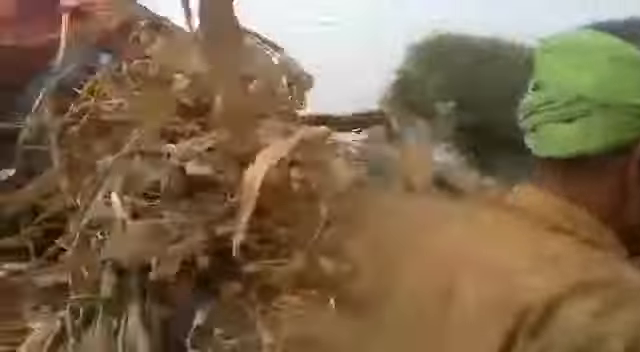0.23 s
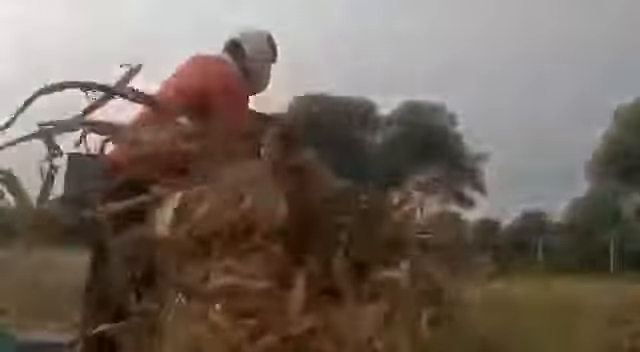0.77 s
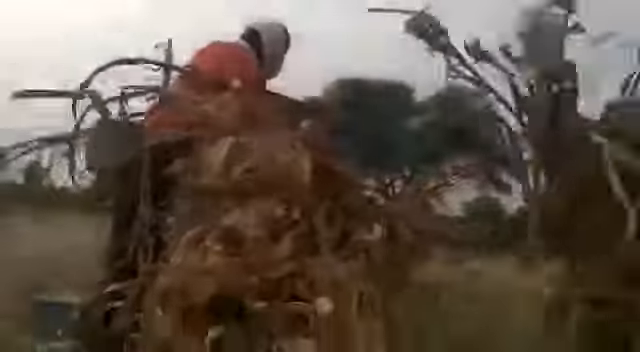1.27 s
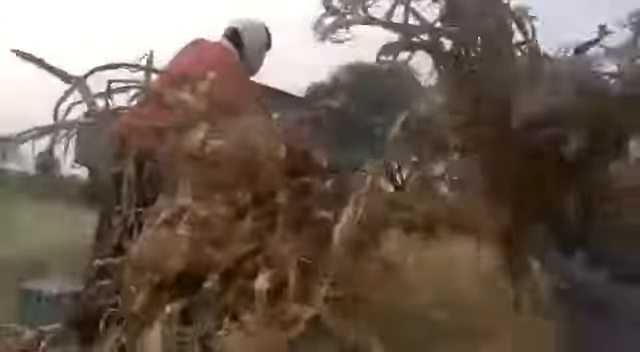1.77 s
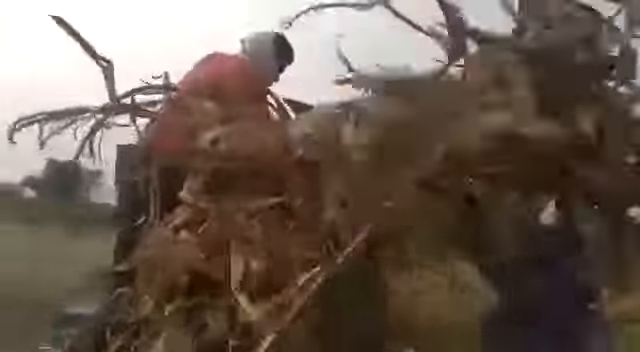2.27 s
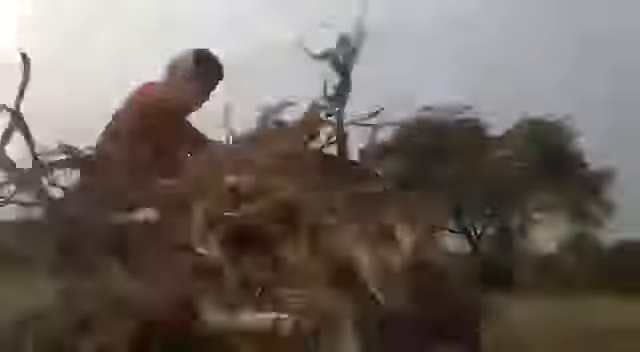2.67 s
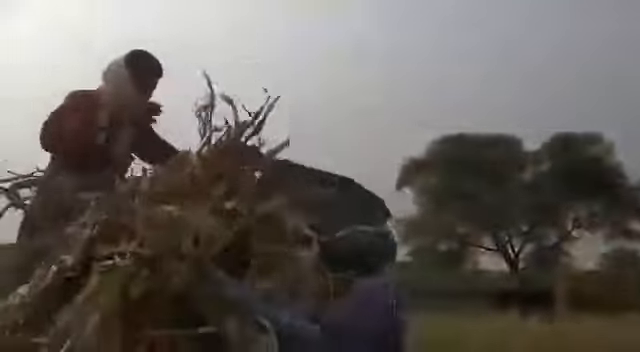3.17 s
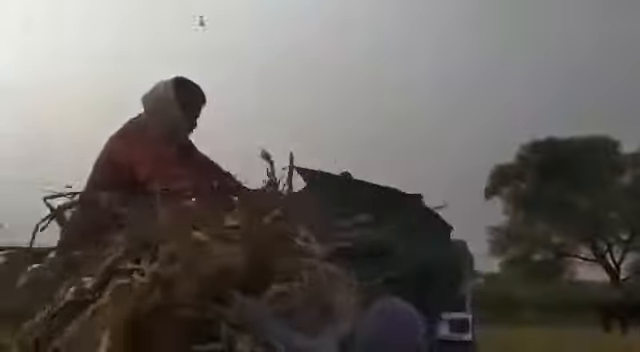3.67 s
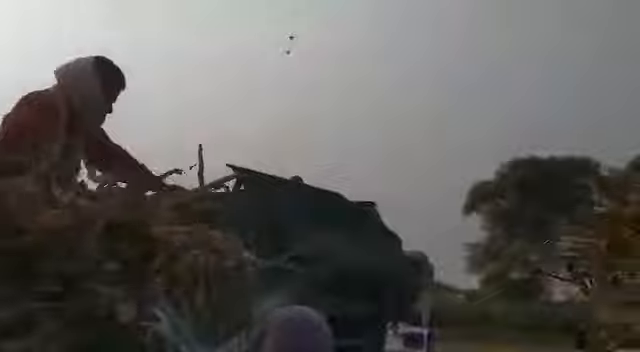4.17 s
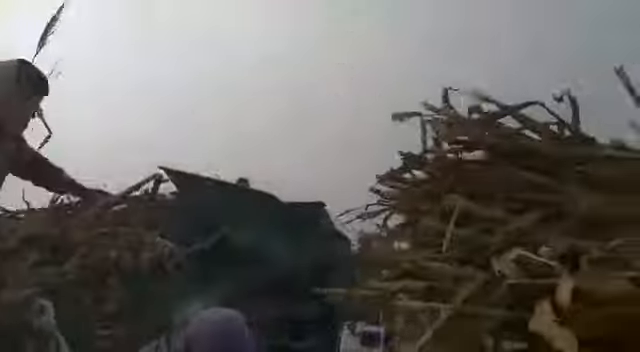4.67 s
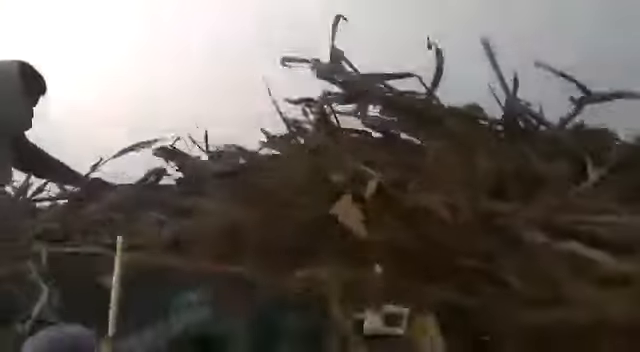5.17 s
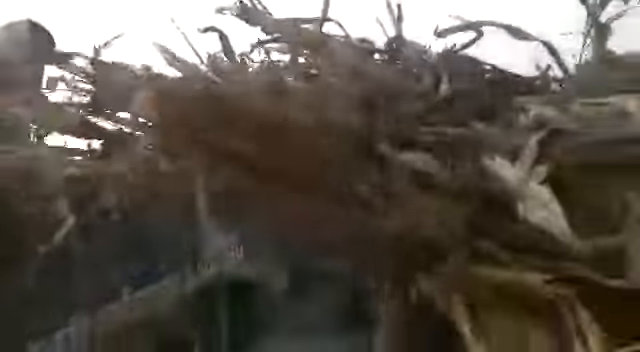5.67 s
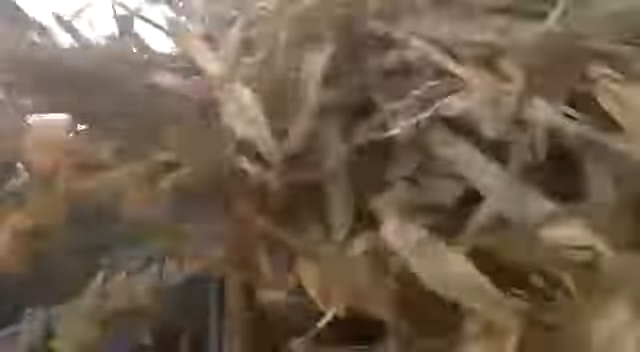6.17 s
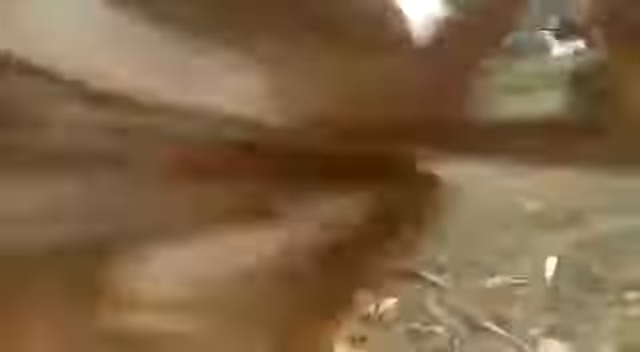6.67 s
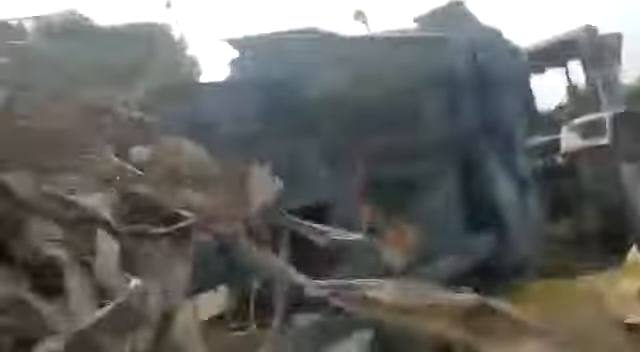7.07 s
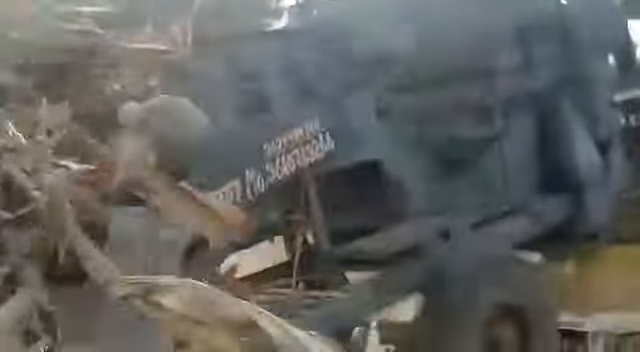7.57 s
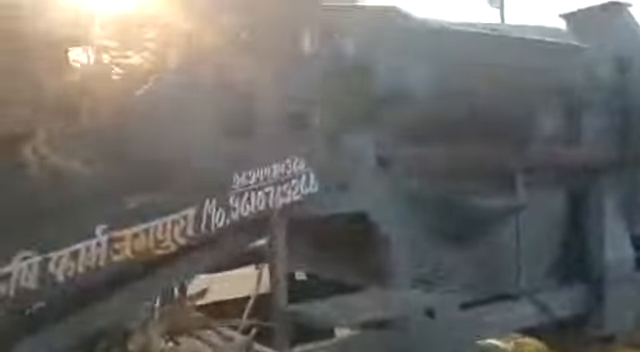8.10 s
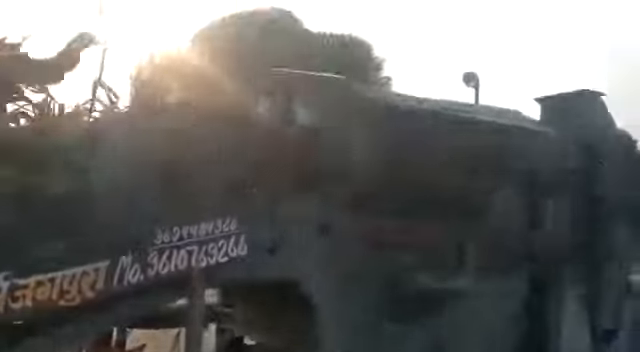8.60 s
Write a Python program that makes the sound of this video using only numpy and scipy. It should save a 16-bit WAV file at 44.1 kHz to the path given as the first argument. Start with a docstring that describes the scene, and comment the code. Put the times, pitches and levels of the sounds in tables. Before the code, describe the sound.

Rapid hollow metal knocking rides on a steady engine drone and rushing fan air, as dry straw crackles nearby and one stalk snaps sharply.

```python
"""An open field: a tractor's diesel drives a thresher, heard by someone walking round the feed chute.
The exhaust drones as a stack of sines locked to the engine's firings.
The drum, geared to the engine, chops into dry stalks once a turn: steel rings clack and boom, tiny clicks crunch.
The blower is shaped noise that rushes and howls in its casing; the side sheet and rotating parts hum.
Showers of tiny clicks make chaff hiss and close stalks rustle; short bright rings are stalks that snap."""
import sys
import numpy as np
from scipy import signal
from scipy.fft import rfft, irfft, next_fast_len
from scipy.io import wavfile
from scipy.ndimage import uniform_filter1d, minimum_filter1d

SR = 44100
rng = np.random.default_rng(int(sys.argv[2]) if len(sys.argv) > 2 else 0)


def generate_wav(sig):
    """Save sig (samples, or channels by samples) to the path in sys.argv[1] as 16-bit PCM at SR."""
    pcm = np.round(np.clip(np.atleast_2d(sig).T, -1, 1) * 32767).astype(np.int16)
    wavfile.write(sys.argv[1], SR, pcm)


N = 389844

# pitch of the housing panel that faces the listener: t/s, f/Hz
PANEL_PITCH = [(0, 378), (.6, 380), (1.3, 320), (2.2, 360), (4.2, 400), (6.1, 288), (6.75, 322), (7.2, 290),
               (8.84, 284)]
# single knocks of the drum, strong and faint, before the ports:
# t/s, boom peak/dB, boom f/Hz, clack peak/dB, clack f/Hz
DRUM_KNOCKS = [(0.0425, -10, 357, -27, 870), (0.1047, -11, 335, -14.5, 840), (0.1725, -9, 390, -21, 810),
               (0.2375, -20, 365, -20, 945), (0.3015, -17, 385, -20, 875), (0.3719, -16, 377, -27, 910),
               (0.428, -14, 368, -19, 880), (0.4962, -11.5, 354, -8, 850), (0.5622, -12.5, 340, -23, 845),
               (0.6262, -8, 342, -16, 930), (0.691, -15, 325, -14, 940), (0.7577, -11.5, 315, -13, 960),
               (0.8217, -8.5, 348, -16, 780), (0.8841, -15, 384, -22.5, 824), (0.951, -13.5, 366, -21, 980),
               (1.0118, -13, 353, -22, 870), (1.079, -9, 317, -15, 870), (1.1427, -8.5, 340, -13, 840),
               (1.209, -7, 318, -19, 800), (1.2755, -11.5, 325, -15, 880), (1.338, -8.5, 307, -11, 850),
               (1.402, -18, 330, -17, 850), (1.4694, -7.5, 318, -11, 746), (1.531, -11, 330, -11.5, 980),
               (1.5961, -10, 317, -15, 850), (1.66, -17, 355, -21, 850), (1.724, -15, 368, -14.5, 810),
               (1.7868, -17, 377, -14, 1010), (1.85, -16.5, 403, -15, 830), (1.9174, -24, 370, -16.5, 840),
               (2.046, -19, 333, -15, 805), (2.1744, -18, 365, -15, 760), (2.304, -17, 324, -16, 930),
               (2.3663, -19, 370, -17, 860), (2.4301, -19, 345, -18, 830), (2.496, -20, 374, -18, 990),
               (2.5595, -23, 360, -24, 950), (2.6233, -23, 357, -19, 900), (2.688, -29, 360, -18, 905),
               (2.8776, -15.5, 333, -19, 870), (5.4814, -28, 345, -14.5, 760), (5.6085, -18, 407, -17, 800),
               (5.672, -17, 310, -19, 760), (5.8643, -19, 326, -22, 736), (5.928, -16, 312, -20, 740),
               (5.992, -17, 315, -23, 736), (6.055, -16, 310, -21, 750), (6.1213, -15.5, 305, -20, 745),
               (6.1784, -15.5, 310, -14.5, 756), (6.2432, -15, 322, -16, 690), (6.3076, -14, 295, -20, 780),
               (6.3704, -8, 302, -14, 770), (6.434, -12, 350, -20, 726), (6.4991, -10, 305, -14, 770),
               (6.5611, -12.5, 324, -18, 830), (6.625, -8, 330, -29, 880), (6.6902, -5.5, 323, -20, 680),
               (6.7539, -9.5, 320, -30, 850), (6.8168, -11, 304, -27, 840), (6.881, -15, 356, -19, 890),
               (6.944, -18, 310, -22, 850), (7.008, -21, 302, -18, 830), (7.135, -22, 300, -17, 780),
               (7.3257, -23, 320, -14.5, 850), (7.3942, -17, 308, -15.5, 805), (7.454, -23, 355, -14, 880),
               (7.518, -27, 302, -17, 800), (7.5859, -22, 285, -13.5, 820), (7.7102, -27, 305, -16.5, 750),
               (7.8982, -35, 310, -20, 744), (7.963, -37, 370, -22, 710), (8.0281, -27, 398, -12.5, 684),
               (8.0908, -32, 377, -20, 700), (8.1546, -24, 345, -27, 715), (8.2211, -18, 328, -19, 670),
               (8.283, -22, 292, -18, 720), (8.3471, -12, 330, -16, 776), (8.4106, -13, 280, -18, 760),
               (8.476, -20, 285, -27, 760), (8.538, -16.5, 300, -19, 710), (8.603, -20, 285, -18, 720),
               (8.666, -24, 308, -18, 810), (8.7298, -24, 320, -14, 875)]


def from_db(db):
    """Turn decibels into a plain gain."""
    return 10 ** (np.asarray(db) / 20)


def rms_one(x):
    """Scale a sound to an average strength (rms) of 1."""
    return x / np.sqrt(np.mean(x ** 2) + 1e-20)


def in_time(rows):
    """Draw each column of a table as a curve, with a value at every sample."""
    s, *columns = np.transpose(rows)
    return [np.interp(np.arange(N) / SR, s, column) for column in columns]


def per_bin(points):
    """Read a table over log frequency at every bin of the spectrum."""
    hz, value = np.transpose(points)
    bin_hz = np.fft.rfftfreq(next_fast_len(N), 1 / SR)
    return np.interp(np.log(bin_hz + 1), np.log(hz), value)


def drift(rate):
    """Smooth chance wandering, with about `rate` turns a second and a spread of 1."""
    step = 40  # samples between the computed points
    r = np.exp(-2 * np.pi * rate * step / SR)
    noise = rng.standard_normal(N // step + 2002)
    slow = signal.lfilter([1], [1, -2 * r, r * r], noise)[2000:]  # skip the filter's start
    return np.interp(np.arange(N) / step, np.arange(len(slow)), rms_one(slow))


def ring(clicks, hz, t60):
    """Each unit click starts a sine of height 1 that dies by 60 dB in t60 seconds."""
    r = np.exp(-np.log(1000) / (t60 * SR))
    w = 2 * np.pi * hz / SR
    return signal.lfilter([0, np.sin(w)], [1, -2 * r * np.cos(w), r * r], clicks + 1e-18)


def panned(pan_db):
    """Left and right gains for a level difference (positive: left is louder)."""
    return from_db(pan_db * np.array([[.5], [-.5]]))


def ports(pair, spectrum=None):
    """Two microphone ports pick up a direct and a scattered signal, coloured by the spectrum if given."""
    # how alike the two ports hear: f/Hz, likeness [-1 to 1]
    likeness = [(100, 1), (400, 0.53), (750, 0.94), (1100, 0.63), (1500, 0), (2300, 0), (2900, 0.71),
                (3300, 0.93), (3600, 1), (4000, 0.0027), (5000, 0.035), (15000, 0.027)]
    # left-right level difference: f/Hz, level/dB
    tilt = [(150, 6), (300, 5), (450, 1), (600, -0.5), (1100, 0.5), (1500, 2), (1900, 3.5), (2500, -5),
            (3150, -3.5), (3600, 1.5), (4200, -7.5), (4900, -9), (6000, 0), (7600, 2), (13000, 3.5)]
    # how far the left port leads: f/Hz, phase/radians
    lead = [(100, 1.46), (430, -1.13), (750, -0.5), (1200, -0.7), (1700, 0), (2300, 2.5), (3000, 3),
            (4000, 3)]
    size = next_fast_len(N)
    direct, scattered = rfft(pair, size)
    alike = np.clip(per_bin(likeness), -1, 1)
    sides = np.array([[1], [-1]])
    both = np.sqrt(1 + alike) * direct + sides * np.sqrt(1 - alike) * scattered
    both = both * from_db(sides * per_bin(tilt) / 2) * np.exp(.5j * sides * per_bin(lead))
    if spectrum is not None:
        both = both * from_db(per_bin(spectrum))
    return irfft(both, size)[:, :N]


def at_ports(pair, spectrum=None):
    """A sound as the two ports pick it up, at rms 1."""
    return rms_one(ports(pair, spectrum))


def stroke(turns, rise, fall):
    """A swell once a turn, at rms 1; rise and fall are shares of the turn."""
    angle = (turns + .5) % 1 - .5
    return rms_one(np.exp(np.minimum(angle / rise, -angle / fall)))


def grains(per_s, spread_db):
    """Tiny fractures and impacts of dry straw: chance clicks of unequal size, at rms 1."""
    size_db = spread_db * np.minimum(rng.exponential(1, (2, N)), 5)
    sizes = from_db(size_db) * rng.choice([-1, 1], (2, N))
    return rms_one(sizes * (rng.random((2, N)) < per_s / SR))


def resonance(hz, width_hz, drive):
    """Turbulence of strength `drive` stirs one broad resonance around the pitch curve `hz`."""
    stir = (rng.standard_normal((2, N)) + 1j * rng.standard_normal((2, N))) * drive
    swing = signal.sosfilt(signal.butter(2, width_hz / 2, fs=SR, output="sos"), stir)
    carrier = np.exp(2j * np.pi * np.cumsum(hz) / SR)
    return at_ports(np.real(swing * carrier))


def rung_each_turn(turns, hz, t60, contact_s=0.029, uneven_db=3.0):
    """A sheet gets a soft push of varying strength every turn and rings on towards the next; rms 1."""
    pushes = np.diff(np.floor(turns), prepend=0) * from_db(uneven_db * drift(22))
    softened = ring(pushes, hz, contact_s)
    return at_ports([ring(softened, hz, t60), np.zeros(N)])


def shafts(turns):
    """The rotating drum and fan hum with faint pure tones, which beat against the exhaust."""
    # hum: multiple of the drum's turn rate, rms level at the start/dB, rms level at the end/dB
    hum_tones = [(5.635, -46, -46), (8, -50, -45.5), (10, -48, -43.5)]
    hum = 0
    for multiple, start_db, end_db in hum_tones:
        level = np.sqrt(2) * from_db(np.linspace(start_db, end_db, N))
        hum = hum + level * np.sin(2 * np.pi * (multiple * turns + rng.random()))
    return hum


def thrum(turns):
    """The big side sheet rings on after each turn and joins the knocks into a low, pitched rumble."""
    # loudest where the listener faces the sheet: t/s, level/dB
    sheet_level = [(0, -31), (1.3, -37), (2.2, -42), (4.2, -44), (4.8, -40), (5.6, -36), (6.4, -33),
                   (7.05, -37), (8.1, -40), (8.4, -32), (8.84, -34)]
    return from_db(in_time(sheet_level)[0]) * rung_each_turn(turns, hz=275.5, t60=0.18)


def blower(gust_db=1.48):
    """Turbulent air rushes out of the fan casing: noise with a fluttering strength."""
    # colour of the rush: f/Hz, level/dB
    air_spectrum = [(20, -43), (55, -16), (110, -2.5), (230, 1), (380, -2.5), (520, -2.5), (700, -0.5),
                    (1050, -2.5), (1400, -8.5), (1900, -8), (2500, -6), (3500, -9.5), (8000, -60),
                    (15000, -40)]
    gusts = from_db(gust_db * drift(19.6))
    return at_ports(rng.standard_normal((2, N)) * gusts, air_spectrum)


def casing(turns, throb=0.55, ring_db=-8):
    """Turbulence makes the fan casing howl in pulses with the drum, and each turn sets it ringing."""
    # heard most towards the casing's open side: t/s, level/dB
    howl_level = [(0, -46), (3.3, -45), (4.4, -35), (5.2, -41), (6, -32), (6.8, -42), (7.3, -35),
                  (8.05, -27.5), (8.84, -36.5)]
    casing_hz = 621.3
    level_db, = in_time(howl_level)
    pulse = 1 + throb * stroke(turns, rise=0.1, fall=0.17)
    howl = resonance(np.full(N, casing_hz), width_hz=173, drive=pulse)
    ringing = from_db(ring_db) * rung_each_turn(turns, casing_hz, t60=0.15)
    return from_db(level_db) * (howl + ringing)


def chaff(turns, throb=0.09, flutter_db=1.55):
    """Shredded straw pelts sheet metal, a little harder around each stroke; coarse and fine bits flurry apart."""
    # colour of the hiss: f/Hz, level/dB
    hiss_spectrum = [(900, -16), (1500, -14), (1900, -10), (2450, -3.5), (3000, -10), (3650, -12),
                     (4200, 0.5), (4900, -1.5), (6000, -6), (7850, -14.5), (9300, -2), (12500, -7),
                     (15500, -15)]
    edges_hz = np.geomspace(700, 16000, 7)
    pelting = 0
    for band in zip(edges_hz, edges_hz[1:]):
        band_pass = signal.butter(2, band, "band", fs=SR, output="sos")
        bits = signal.sosfilt(band_pass, grains(per_s=6000, spread_db=0.9))
        pelting = pelting + bits * from_db(flutter_db * drift(24))
    pulse = 1 + throb * stroke(turns, rise=0.59, fall=0.039)
    return at_ports(pelting * pulse, hiss_spectrum)


def rubbing():
    """How hard close stalks rub: loose straw thickens along the walk, and each passing bundle adds a swell."""
    # stalks brushing past: t at the height/s, length/s, level/dB, left-right difference/dB
    passing_stalks = [(.28, 0.14, -29, 0), (2.552, 0.033, -23.5, -6), (3.7, 6.3, -34, -9),
                      (4.92, 0.32, -28.5, -2), (6.357, 0.28, -30, 6), (6.724, 0.04, -19, 5),
                      (6.84, 0.065, -22, 3), (7.1, 0.86, -29.5, 8), (7.646, 0.021, -25, 0)]
    t = np.arange(N) / SR
    power = from_db(np.linspace(-35, -25.5, N)) ** 2  # the loose straw, start to end in dB
    for s, length_s, db, pan_db in passing_stalks:
        swell = np.exp(-np.minimum((2 * (t - s) / length_s) ** 2, 20))
        power = power + (from_db(db) * panned(pan_db)) ** 2 * swell
    return np.sqrt(power)


def rustle(clump_db=2.07):
    """Dry leaves and stalks rub in clumps of fine crackle."""
    # colour of the crackle: f/Hz, level/dB
    crackle_spectrum = [(1000, -26), (3000, -39), (5000, 3.5), (6500, 2.5), (7850, 2.5), (9300, 0.5),
                        (12500, -19), (15500, -19)]
    clumps = from_db(clump_db * drift(25))
    return at_ports(grains(per_s=9000, spread_db=2.5) * clumps, crackle_spectrum)


def snaps(crack_t60=0.0023, splinter_s=.0025, splinter_db=-29):
    """Dry stalks break: each part of a snap is a ringing click plus the fading noise force of splintering."""
    # parts of snaps; the loud snap near 7.645 s is built of several rings at different pitches:
    # t/s, level/dB, f/Hz, left-right difference/dB
    snap_parts = [(1.6466, -9, 4400, -7), (2.515, -14, 4550, -6.5), (2.5614, -9, 6640, -21),
                  (3.3558, -5, 5350, -14), (6.7079, -6, 6970, 5), (6.8135, -15, 7270, -2.5),
                  (7.6303, -15, 2000, 0), (7.6447, -9, 2200, 0), (7.645, 3, 5900, 4), (7.647, -5, 3800, 0),
                  (7.6495, -16, 2000, 0), (7.8366, -9, 4550, -1)]
    t = np.arange(SR // 20) / SR
    out = np.zeros((2, N + SR))
    for s, db, hz, pan_db in snap_parts:
        force = from_db(splinter_db) * rng.standard_normal((2, len(t))) * np.exp(-t / splinter_s)
        force[:, 0] = 1  # the crack itself
        at = round(s * SR)
        out[:, at:at + len(t)] += from_db(db) * panned(pan_db) * ring(force, hz, crack_t60)
    return out[:, :N]


def exhaust(firings, waver_db=0.9, uneven_db=0.52, jitter=0.0032):
    """Each firing pushes a pressure swing out of the pipe: sines at whole multiples of its rate, in step."""
    # as heard from the moving listener: t/s, level/dB, left-right difference/dB
    exhaust_path = [(0, -19.5, 0.5), (1.4, -19, -0.5), (2.1, -19.5, 3.5), (4.5, -20, 8), (5.7, -21.5, 9),
                    (6.6, -21, 4.5), (7.3, -24.2, 9), (8.84, -25.5, 9)]
    # tone: multiple of the firing rate, level/dB before scaling to rms 1, share of the left-right difference
    orders = [(2, -7.5, .1), (3, 2, 0.55), (4, 0, 0.88), (5, -4, 1.55), (6, -25, 1.3), (7, -19.5, 1),
              (8, -35, 1)]
    level_db, pan_db = in_time(exhaust_path)
    angle = 2 * np.pi * (firings + .12 + jitter * drift(19))  # .12: starting point in the firing cycle
    tone = 0
    for multiple, db, share in orders:
        strength = from_db(db + waver_db * drift(1.07))
        tone = tone - strength * np.sin(round(multiple) * angle) * panned(share * pan_db)
    return rms_one(tone) * from_db(level_db + uneven_db * drift(27))


def growl(turns, throb=0.29):
    """Stalks dragged round the drum stir the housing's resonance between the blows."""
    pulse = 1 + throb * stroke(turns, rise=0.037, fall=0.94)
    return resonance(in_time(PANEL_PITCH)[0], width_hz=180, drive=pulse)


def chopping(turns, uneven_db=3.0):
    """Stalks crunch in a burst of tiny fractures as the beaters sweep through them."""
    # colour of the crunch: f/Hz, level/dB
    crunch_spectrum = [(120, -35), (300, -11), (450, 7.5), (570, -14.5), (850, -2), (1150, -3.5),
                       (1500, -9), (2400, -8.5), (3500, -5.5), (7000, -51), (15000, -45)]
    swell = stroke(turns, rise=0.14, fall=0.13) * from_db(uneven_db * drift(2.6))
    return at_ports(grains(per_s=12000, spread_db=1.5) * swell, crunch_spectrum)


def light_knocks(turns, load_db, chop_db, spread_db=0.3):
    """Rows like DRUM_KNOCKS for every turn of the drum that has no knock listed within 30 ms."""
    hits = np.flatnonzero(np.diff(np.floor(turns)) > 0)
    boom, clack = spread_db * rng.standard_normal((len(hits), 2)).T
    boom_db = load_db[hits] + 7.5 + boom
    clack_db = chop_db[hits] + 10 + clack
    clack_hz = np.full(len(hits), 812)
    rows = np.transpose([hits / SR, boom_db, in_time(PANEL_PITCH)[0][hits], clack_db, clack_hz])
    listed_s = np.array(DRUM_KNOCKS)[:, 0]
    return [row for row in rows if np.abs(listed_s - row[0]).min() > .03]


def struck(modes, hz, loose, mode_db=1.5, detune=0.042):
    """Steel struck through straw: its modes swell and die, varying more when the contact is loose; peak 1."""
    multiple, db, swing_s = np.array(modes).T[:, :, None]
    share, shift, place = rng.standard_normal((3, len(modes), 1))
    t = np.arange(SR // 20) / SR
    swell = (t / swing_s * np.exp(-t / swing_s)) ** 2
    mode_hz = hz * multiple * np.exp(detune * shift)
    # `loose` scatters the phase, in turns (whole cycles)
    angle = None
    cycles = mode_hz * (t - swing_s) + loose * place
    rings = from_db(db + mode_db * share) * swell * np.sin(2 * np.pi * cycles)
    total = rings.sum(axis=0)
    return total / np.abs(total).max()


def knocks(rows):
    """Once a turn the beaters hit the bundle: the grate gives a hollow clack and the housing booms."""
    # drum housing: multiple of the boom's pitch, level/dB before scaling to peak 1, time to full swing/s
    housing_modes = [(1, 1, 0.00547), (1.36, -7.5, 0.00447), (.8, -7, 0.0063)]
    # grate under the beaters: multiple of the clack's pitch, level/dB before scaling, time to full swing/s
    grate_modes = [(.68, -5, 0.00329), (.86, -2, 0.00299), (1.08, -1.5, 0.00249), (1.36, -4, .0022),
                   (1.8, -10.5, 0.00168), (2.7, -14, 0.00117)]
    boom_lead_s, clack_lead_s = 0.00496, 0.002977  # each starts this much before the row's time
    out = np.zeros(N + SR)
    for s, boom_db, boom_hz, clack_db, clack_hz in rows:
        boom = from_db(boom_db) * struck(housing_modes, boom_hz, loose=0.16)
        clack = from_db(clack_db) * struck(grate_modes, clack_hz, loose=0.36)
        for lead_s, sound in ((boom_lead_s, boom), (clack_lead_s, clack)):
            at = max(0, int((s - lead_s) * SR))
            out[at:at + len(sound)] += sound
    return ports([out[:N], np.zeros(N)])


def scene():
    """The engine turns the drum; the load sets the growl and the light knocks, the walk the other levels."""
    # engine speed: t/s, firing rate/Hz
    engine_speed = [(0.0, 44.83), (1.0, 44.92), (2.0, 45.25), (2.8, 45.39), (3.6, 45.7), (4.5, 45.74),
                    (5.5, 45.72), (6.5, 45.64), (7.5, 45.58), (8.84, 45.46)]
    # load on the drum, swelling with the bundles fed in:
    # t/s, housing level/dB that the light knocks and the growl follow
    drum_load = [(0, -19), (.35, -29), (.95, -28), (1.2, -23), (2.1, -28), (3.5, -31), (4.45, -40),
                 (5.2, -32.5), (6.2, -29), (6.7, -18.5), (7.05, -32.5), (8.05, -51), (8.38, -30),
                 (8.84, -43)]
    # the walk, at times screened by bundles: t/s, chaff level/dB, chopping level/dB, blower level/dB
    walk = [(0, -25, -28.5, -25.5), (.5, -25, -24, -25), (1.7, -26.5, -29.5, -25), (2.5, -24.5, -31, -26.5),
            (3.6, -23, -37.5, -25), (5.4, -22, -36.5, -25), (6.65, -23.5, -38, -25), (7.2, -21.5, -33, -24),
            (8.84, -20, -32, -24)]
    firings = np.cumsum(in_time(engine_speed)[0]) / SR
    turns = .335 + .34444 * firings  # starting turn, then drum turns per firing
    load_db, = in_time(drum_load)
    chaff_db, chop_db, blower_db = in_time(walk)
    growl_db = -32.5 + 0.6 * (load_db - load_db.mean())  # follows part of the load's swing
    drum = knocks([*DRUM_KNOCKS, *light_knocks(turns, load_db, chop_db)])
    drum = drum + from_db(growl_db) * growl(turns) + thrum(turns) + shafts(turns)
    stalks = from_db(chop_db) * chopping(turns)
    air = from_db(blower_db) * blower() + casing(turns)
    straw = from_db(chaff_db) * chaff(turns) + rubbing() * rustle() + snaps()
    return exhaust(firings) + drum + stalks + air + straw


def limiter(x, threshold_db=-4.5, share=.8, recover_s=.03, ahead_s=.001):
    """Peaks over the threshold pull the gain down by a share of the excess; it creeps back afterwards."""
    peak_db = 20 * np.log10(np.abs(x).max(axis=0) + 1e-9)
    over_db = np.maximum(peak_db - threshold_db, 1e-6)
    elapsed = np.arange(N) / (SR * recover_s)
    # the running maximum holds each peak's excess while it fades
    held_db = np.exp(np.maximum.accumulate(np.log(over_db) + elapsed) - elapsed)
    size = 2 * int(ahead_s * SR) + 1
    # each of the two filters looks ahead_s forward and back
    gain_db = uniform_filter1d(minimum_filter1d(-share * held_db, size), size)
    return x * from_db(gain_db)


def record(dry):
    """The phone's processing lowers everything above 8 kHz, a limiter ducks hard hits, the top is cut steeply."""
    # step in the phone's treble: f/Hz, level/dB
    treble_step = [(7850, 0), (8200, -17)]
    size = next_fast_len(N)
    heard = irfft(rfft(dry, size) * from_db(per_bin(treble_step)), size)[:, :N]
    steep_cut = signal.ellip(10, .1, 80, 15600, fs=SR, output="sos")  # cutoff 15600 Hz
    return signal.sosfilt(steep_cut, limiter(heard))


dry = scene()
out = record(dry)
generate_wav(out)
```